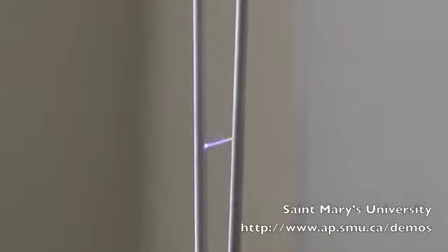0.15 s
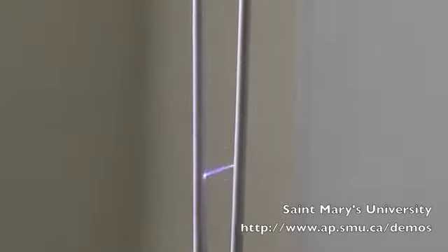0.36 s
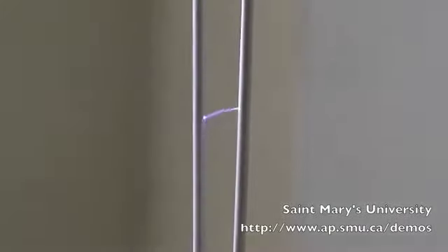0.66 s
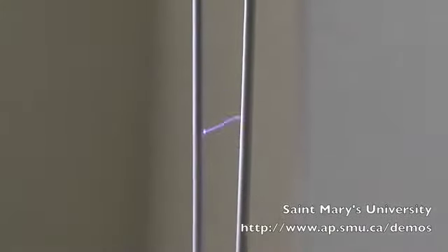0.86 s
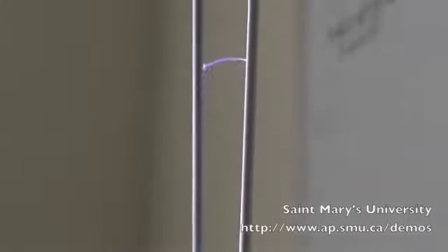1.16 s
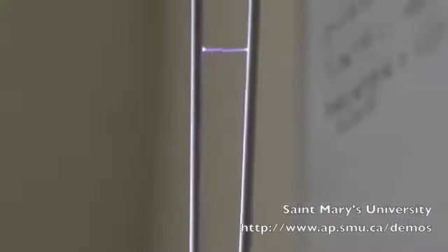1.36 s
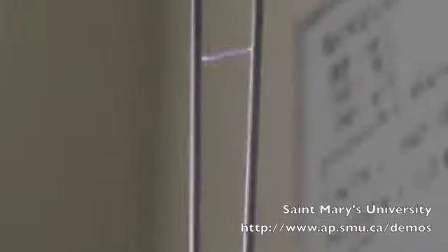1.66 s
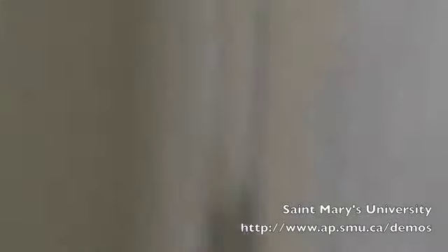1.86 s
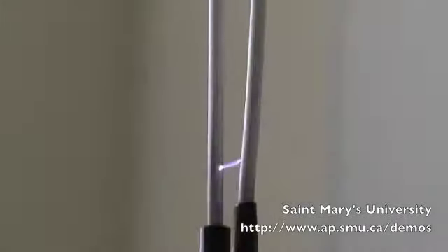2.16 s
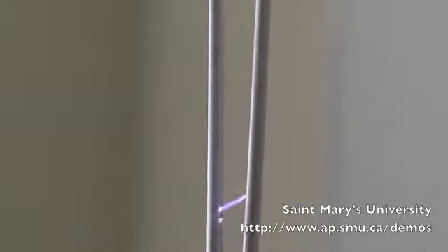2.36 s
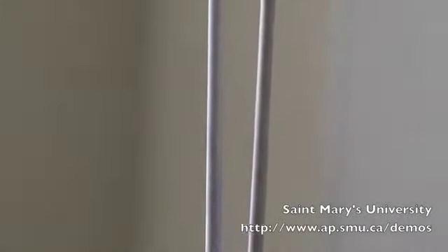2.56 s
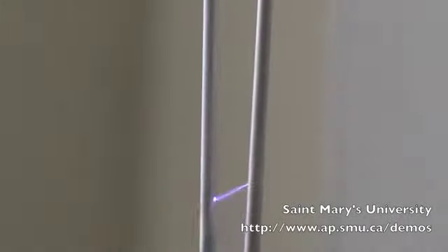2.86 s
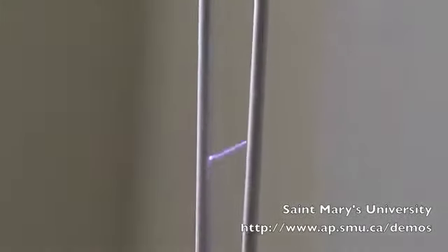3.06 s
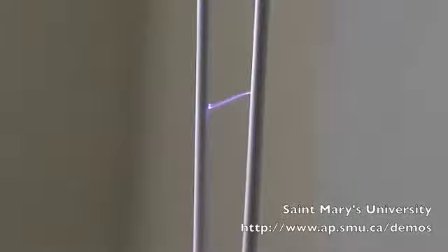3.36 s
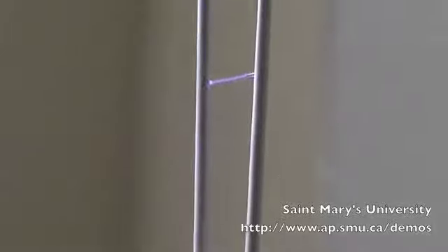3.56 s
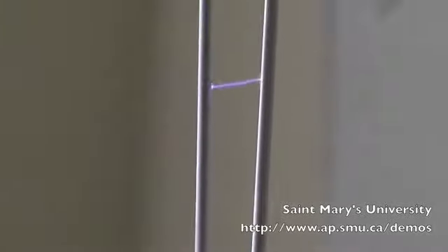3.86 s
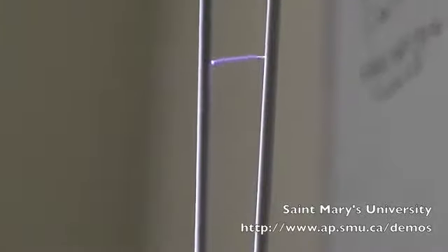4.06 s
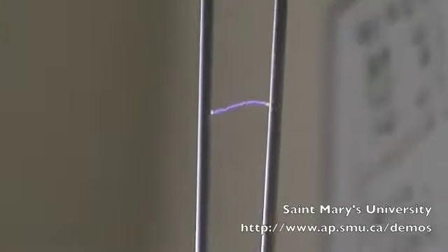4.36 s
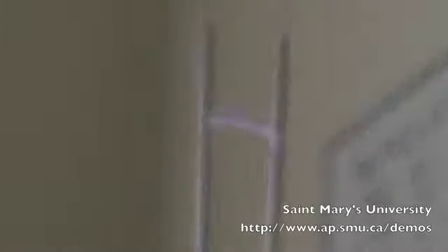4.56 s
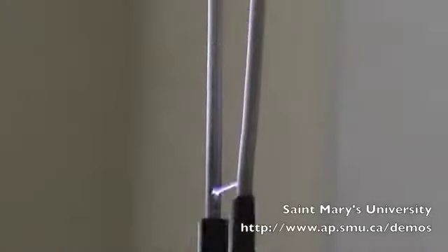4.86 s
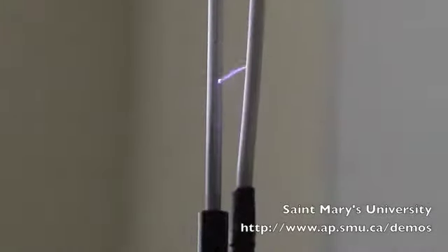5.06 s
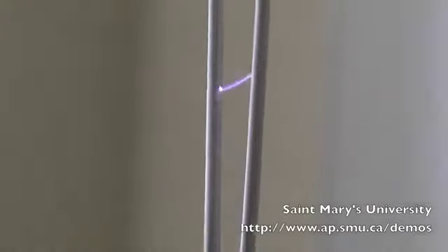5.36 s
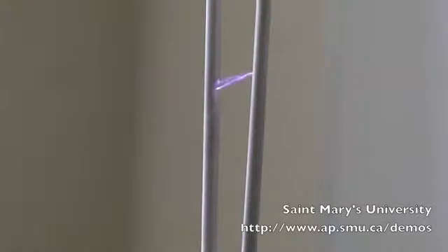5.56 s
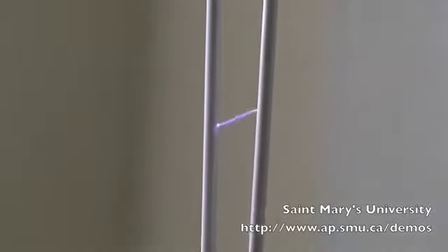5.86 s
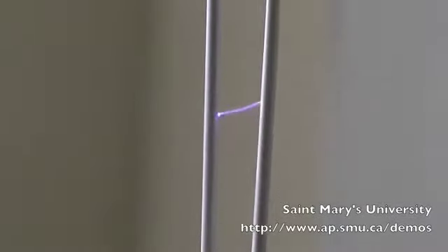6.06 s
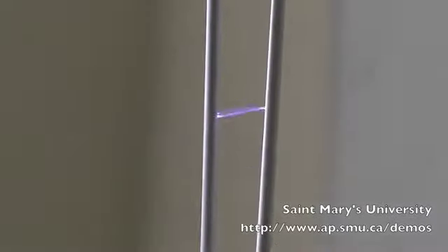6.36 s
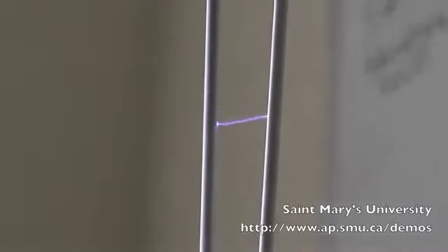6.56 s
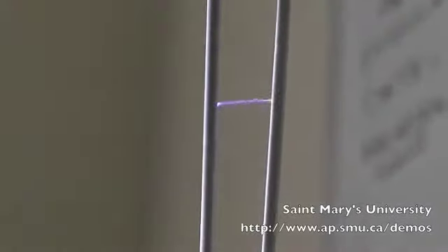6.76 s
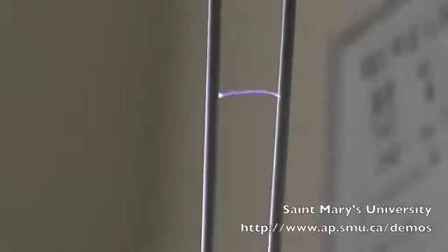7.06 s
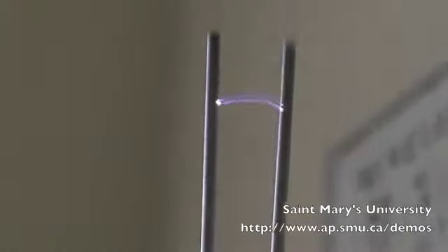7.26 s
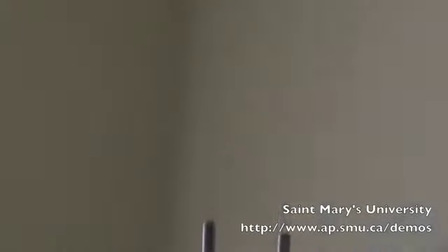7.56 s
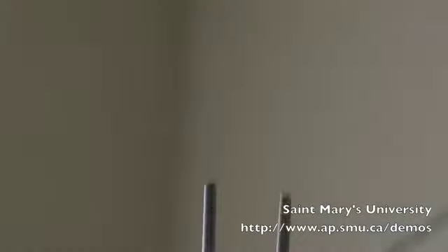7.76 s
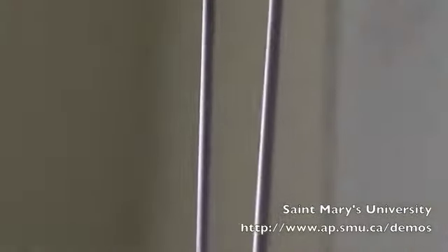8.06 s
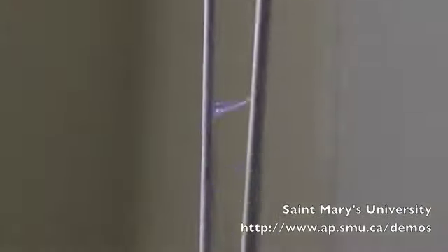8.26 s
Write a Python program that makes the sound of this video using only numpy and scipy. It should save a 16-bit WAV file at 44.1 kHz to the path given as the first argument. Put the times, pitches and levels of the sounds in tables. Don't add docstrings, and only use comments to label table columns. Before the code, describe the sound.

A high-voltage spark between two rods makes a continuous, raspy sixty-per-second buzz with sharp, bright snaps. Its colour slides as the arc climbs, then jolts roughly when it restarts low near 2 and 4.8 seconds. A faint distant engine drones in swells in the middle. Close stereo microphones in a hard, reverberant room swing away near 7.5 seconds, changing the echoes.

```python
import sys
import numpy as np
from scipy import signal
from scipy.fft import rfft, irfft, next_fast_len
from scipy.io import wavfile
from scipy.ndimage import uniform_filter1d

SR = 44100
rng = np.random.default_rng(int(sys.argv[2]) if len(sys.argv) > 2 else 0)


def wav_record(signal):
    frames = np.transpose(np.atleast_2d(signal))
    bounded = np.clip(frames, -1, 1)
    quanta = np.round(bounded * 32767).astype(np.int16)
    wavfile.write(sys.argv[1], SR, quanta)


def boost(x):
    u = np.asarray(x, float) / 20
    return 10 ** u


N = 370881

MAINS_HZ = 60
TURN_S = 7.54
MIC_GAP_MS = 0.085
ROOM_T60_S = 0.8

# start_s, end_s, spark arrival within the mains cycle_ms, mains slip_ms_per_s
TAKES = [
    (0, 2.1, 13.0, -.09),
    (1.7, 4.95, 2.11, .09),
    (4.6, 8.41, 13.17, .2),
]
# start_s, end_s
DISSOLVES = [
    (-1, -.5),
    (1.72, 2.08),
    (4.6, 4.92),
    (9, 9.5),
]
# pitch_hz, level_db per Hz
AIR_SPECTRUM = [(25, -1.5), (45, -15), (65, -1), (130, 1.5), (300, -5.5), (800, -1.5), (3000, -23),
                (16000, -39)]
# centre_s, level_db over the rumble, pitch_hz
THUDS = [
    (7.15, 4, 95),
    (7.82, 4, 90),
    (8.13, 6.5, 120),
]
# time_s, pitch_hz
ENGINE_PITCH = [
    (2.1, 92.3),
    (2.75, 94.5),
    (3.4, 103.6),
    (4.05, 109.3),
    (4.22, 104),
    (4.42, 108.5),
    (5.05, 106.5),
]
# start_s, length_s, level_db, octave_db against the tone, throb depth_0_to_1
ENGINE_SWELLS = [
    (2.246, 0.32, -73, -4, .2),
    (2.62, .66, -63.5, -12, .1),
    (3.37, 0.087, -64, -16.5, 0.3),
    (3.561, 0.51, -66, -8, 0.6),
    (4.15, .07, -71, -4, .1),
    (4.3, .3, -70, -14, .4),
    (4.62, 0.29, -66, -23, 0),
]
# start_s, level_db
UPSETS = [
    (1.775, -44),
    (2.11, -46.5),
    (4.835, -44),
    (4.95, -49),
    (7.545, -44),
    (7.63, -46),
]
# restart_s, ...
STRIKES = [
    (-.7, 1.761),
    (-.5, 2.111),
    (2.13, 4.831, 7.541),
]
# time_s, spark level_db, direct sound against the room_db
ARC_STRENGTH = [(0.0, -29, 3.5), (1.36, -29.5, 2.5), (1.42, -29, 2), (1.9, -29, 0), (2.1, -33, 3.5),
                (2.53, -29, 3), (3.61, -27.5, 2), (3.72, -30, 2), (4.0, -30, 2), (4.54, -32, 4.5),
                (4.78, -30.5, 0), (4.9, -29.5, 4), (5.1, -33, 3), (5.22, -28.5, 2), (6.07, -29.5, 3),
                (6.3, -29.5, 2.5), (7.1, -31, 3.5), (7.5, -28, -0.5), (7.82, -27, 2), (8.41, -31, 4)]
# time_s, lateness_ms, height jump_0_to_1, level_db against the usual
ODD_SPARKS = [(1.18, 0, 0, -2.5), (1.23, 0, 0, 2.5), (1.78, 0, 0, 2.5), (3.636, 0, 0, .5),
              (3.653, 0, 0, -4), (3.67, 0, 0, -2), (3.686, 0, 0, -1.5), (4.503, 0, 0, 1),
              (4.536, 0, 0, 2.5), (4.553, 0, 0, 2.5), (5.68, 0, 0, -3), (5.93, 0, 0, -2.5),
              (6.08, 0, 0, 2.5), (6.164, 0, 0, -2.5), (6.314, 0, 0, -3.5), (6.514, 0, 0, -2.5),
              (6.53, 0, 0, -3), (7.181, 0, 0, -3), (2.119, 0, 0, 2.5), (1.796, 0, 0, -20), (2.069, 0, 0, 2),
              (2.103, 0, 0, 5.5), (4.036, 0, 0, -1.5), (4.053, 0, 0, 4), (4.069, 0, 0, 2),
              (4.947, .63, .3, -1), (6.064, 0, 0, 3), (7.63, 0, 0, -6)]
# pitch_hz, level_db per Hz
SPARK_SPECTRUM = [(100, -69), (250, -68.5), (1300, -42.5), (2900, -36.5), (3500, -22), (3750, -14),
                  (5000, -9), (9000, -3.5), (12000, -4), (16000, -12.5)]
# lag with the arc low_ms, change at the top_ms, left_db, right_db
ECHOES = [(.27, -0.06, -18.5, -12.5), (.59, .36, -15, -15), (1.38, -.66, -14, -13), (2.99, 0, -5.5, -6),
          (4.47, -.36, -13, -10), (5.68, -1.3, -12.5, -25), (6.66, -.52, -25, -13), (8.14, -1.38, -13, -15),
          (10.25, -0.35, -30, -14), (11.96, -1.94, -14, -19), (13.35, -1.81, -15, -13),
          (13.45, .59, -17, -21.5), (16.57, -1.6, -20, -12)]
TURNED_ECHOES = [(.82, -2.2, -9, -11), (3.02, 0.81, -7.5, -7), (4.40, 0.97, -12, -8.5),
                 (5.21, 0.074, -9, -12), (6.4, -0.62, -16, -15), (7.8, -.5, -12, -14), (11.47, 0, -13, -12),
                 (13.33, -3, -16, -14)]
# pitch_hz, level_db
WALL_COLOUR = [(1500, 21), (5000, 0.7), (16000, -2)]
# pitch_hz, then level_db against the spark at four heights
LOW_ARC_MODES = [(180, -43, -47, -47, -49), (240, -38, -39, -38, -40), (300, -43, -45, -48, -47),
                 (360, -42, -42, -41, -40), (420, -38, -40, -40, -40), (480, -35, -35, -36, -37),
                 (540, -47, -44, -39, -38), (600, -32, -33, -33, -35), (660, -30, -31, -30, -30),
                 (720, -35, -34, -32, -33), (780, -38, -40, -40, -40), (840, -35, -38, -38, -41),
                 (900, -28, -31, -33, -36), (960, -42, -33, -28, -26), (1020, -28, -30, -30, -35),
                 (1080, -31, -32, -32, -35), (1140, -33, -36, -35, -38), (1200, -34, -40, -41, -40),
                 (1260, -38, -44, -36, -34), (1320, -26, -23, -21, -25), (1380, -35, -30, -29, -29),
                 (1440, -29, -32, -32, -34), (1500, -36, -44, -38, -38), (1560, -30, -36, -33, -32),
                 (1620, -26, -30, -34, -35), (1680, -29, -30, -26, -26), (1740, -29, -32, -27, -24),
                 (1800, -33, -35, -39, -33), (1860, -44, -42, -36, -36), (1920, -24, -27, -33, -26)]
LOW_ARC_UPPER_MODES = [(1980, -28, -31, -37, -33), (2040, -27, -31, -30, -29), (2100, -32, -29, -34, -33),
                       (2160, -37, -57, -51, -43), (2220, -27, -34, -38, -34), (2280, -36, -29, -25, -33),
                       (2340, -29, -30, -32, -27), (2400, -31, -30, -29, -23), (2460, -30, -34, -38, -44),
                       (2520, -28, -41, -31, -29), (2580, -34, -31, -31, -30), (2640, -25, -23, -30, -24),
                       (2700, -25, -22, -27, -30), (2760, -31, -28, -31, -28), (2820, -46, -51, -49, -51),
                       (2880, -32, -32, -40, -33), (2940, -21, -24, -23, -26), (3000, -27, -29, -17, -22),
                       (3060, -28, -22, -32, -28), (3120, -27, -33, -31, -32), (3180, -30, -32, -31, -33),
                       (3240, -26, -23, -22, -28), (3300, -31, -21, -31, -30), (3360, -23, -22, -33, -30),
                       (3420, -29, -35, -34, -24), (3480, -34, -34, -42, -40), (3540, -27, -33, -33, -30),
                       (3600, -27, -22, -29, -20), (3660, -29, -30, -27, -25)]
# pitch_hz, then level_db at four heights
HIGH_ARC_MODES = [(180, -52, -50, -48, -49), (240, -41, -41, -41, -40), (300, -52, -49, -46, -41),
                  (360, -39, -37, -36, -34), (420, -41, -42, -42, -40), (480, -38, -40, -41, -39),
                  (540, -36, -36, -35, -34), (600, -37, -42, -46, -45), (660, -30, -32, -34, -33),
                  (720, -33, -34, -32, -29), (780, -38, -37, -35, -34), (840, -41, -38, -36, -35),
                  (900, -40, -51, -42, -37), (960, -27, -29, -28, -25), (1020, -45, -40, -32, -27),
                  (1080, -35, -36, -37, -39), (1140, -40, -40, -42, -46), (1200, -41, -38, -36, -39),
                  (1260, -32, -27, -24, -25), (1320, -34, -26, -24, -26), (1380, -28, -26, -25, -23),
                  (1440, -38, -31, -31, -27), (1500, -46, -36, -35, -32), (1560, -35, -33, -28, -28),
                  (1620, -30, -29, -26, -27), (1680, -28, -27, -30, -41), (1740, -28, -27, -22, -27),
                  (1800, -31, -35, -36, -30), (1860, -39, -44, -51, -37), (1920, -31, -42, -39, -28)]
HIGH_ARC_UPPER_MODES = [(1980, -39, -32, -37, -31), (2040, -34, -35, -28, -40), (2100, -30, -29, -29, -34),
                        (2160, -44, -45, -33, -28), (2220, -34, -28, -33, -29), (2280, -27, -28, -34, -25),
                        (2340, -27, -22, -22, -22), (2400, -28, -29, -36, -27), (2460, -47, -50, -31, -27),
                        (2520, -31, -38, -31, -46), (2580, -30, -27, -28, -28), (2640, -25, -23, -29, -23),
                        (2700, -27, -28, -23, -20), (2760, -30, -28, -28, -25), (2820, -40, -36, -35, -45),
                        (2880, -53, -28, -26, -38), (2940, -26, -31, -30, -20), (3000, -20, -25, -29, -22),
                        (3060, -30, -23, -21, -28), (3120, -30, -36, -33, -28), (3180, -35, -32, -35, -35),
                        (3240, -29, -33, -29, -32), (3300, -25, -21, -28, -26), (3360, -32, -25, -20, -24),
                        (3420, -29, -30, -26, -24), (3480, -36, -35, -35, -32), (3540, -31, -27, -30, -36),
                        (3600, -27, -24, -23, -27), (3660, -26, -28, -22, -24)]
# pitch_hz, arc at the rod tips_db, just after the turn_db, a little later_db
LATE_MODES = [(180, -49, -47, -45), (240, -41, -36, -36), (300, -40, -47, -44), (360, -33, -42, -40),
              (420, -42, -39, -38), (480, -37, -35, -35), (540, -35, -40, -39), (600, -48, -32, -31),
              (660, -29, -26, -28), (720, -28, -29, -32), (780, -35, -40, -39), (840, -40, -38, -36),
              (900, -44, -33, -30), (960, -24, -32, -30), (1020, -25, -24, -26), (1080, -36, -31, -29),
              (1140, -33, -30, -32), (1200, -43, -35, -38), (1260, -36, -37, -38), (1320, -25, -24, -21),
              (1380, -28, -22, -25), (1440, -20, -42, -33), (1500, -27, -43, -41), (1560, -31, -27, -33),
              (1620, -26, -27, -32), (1680, -31, -24, -25), (1740, -21, -30, -31), (1800, -41, -38, -35),
              (1860, -50, -35, -36), (1920, -23, -27, -31)]
LATE_UPPER_MODES = [(1980, -23, -37, -38), (2040, -38, -22, -26), (2100, -29, -25, -26),
                    (2160, -35, -45, -49), (2220, -31, -44, -41), (2280, -34, -23, -27),
                    (2340, -22, -26, -28), (2400, -21, -23, -33), (2460, -32, -30, -31),
                    (2520, -46, -29, -31), (2580, -36, -30, -31), (2640, -29, -26, -23),
                    (2700, -19, -30, -24), (2760, -26, -30, -28), (2820, -46, -39, -47),
                    (2880, -28, -31, -28), (2940, -24, -32, -21), (3000, -23, -31, -24),
                    (3060, -23, -29, -21), (3120, -31, -36, -29), (3180, -36, -35, -29),
                    (3240, -29, -23, -18), (3300, -24, -22, -18), (3360, -26, -29, -24),
                    (3420, -27, -35, -34), (3480, -37, -31, -47), (3540, -36, -30, -27),
                    (3600, -28, -23, -22), (3660, -19, -20, -29)]
# pitch_hz, phase_rad
MODE_SKEW = [(300, .12), (750, 0.23), (1200, 0.18), (1600, 0.029), (2500, 0.12), (3400, 0.27)]


def rms_one(x):
    return x / np.sqrt(np.mean(x ** 2) + 1e-20)


def along(rows, s):
    t, *columns = np.transpose(rows)
    return [np.interp(s, t, c) for c in columns]


def colour(points, size):
    hz, level_db = np.transpose(points)
    grid = np.maximum(np.fft.rfftfreq(size, 1 / SR), 1)
    return boost(np.interp(np.log(grid), np.log(hz), level_db))


def dissolve(rise, fall, s):
    return np.interp(s, rise, [0, 1]) * np.interp(s, fall, [1, 0])


def room_air(side_db):
    mid, side = irfft(rfft(rng.standard_normal((2, N))) * colour(AIR_SPECTRUM, N), N)
    t = np.arange(N) / SR
    power = np.zeros(N)
    for take_db, rise, fall in zip((-67.5, -67, -65.5), DISSOLVES, DISSOLVES[1:]):
        power += (boost(take_db) * dissolve(rise, fall, t)) ** 2
    return np.sqrt(power) * rms_one(mid + boost(side_db) * side * [[1], [-1]])


def handling(width_hz):
    centre_hz, from_s, thud_s, level_db = 62.7, 6.8, 0.05, -72
    t = np.arange(N) / SR
    band = signal.butter(2, [centre_hz - width_hz, centre_hz + width_hz], "band", fs=SR, output="sos")
    out = rms_one(signal.sosfilt(band, rng.standard_normal(N))) * np.clip(t - from_s, 0, 1)
    for s, over_db, hz in THUDS:
        swell = np.exp(-((t - s) / thud_s) ** 2)
        out += boost(over_db) * swell * np.sin(2 * np.pi * hz * (t - s))
    return boost(level_db + np.array([[1.5], [-1.5]])) * out


def drone():
    edge_s, throb_hz = 0.056, 14
    t = np.arange(N) / SR
    hz, = along(ENGINE_PITCH, t)
    phase = 2 * np.pi * np.cumsum(hz) / SR
    out = np.zeros(N)
    for start, length, level_db, octave_db, throb in ENGINE_SWELLS:
        to_edge = np.minimum(t - start, start + length - t)
        shape = np.clip(to_edge / edge_s + 1, 0, 1) ** 2
        tone = (1 + throb * np.sin(2 * np.pi * throb_hz * t)) * np.sin(phase)
        octave = boost(octave_db) * np.sin(2 * phase)
        out += shape * boost(level_db) * (tone + octave)
    return np.sqrt(2) * out * boost(np.array([[1.2], [-1.2]]))


def upsets():
    t60_s, attack_s = 1, 0.0021
    t = np.arange(N) / SR
    shape = np.zeros(N)
    for s, level_db in UPSETS:
        decay = boost(level_db - 60 * np.maximum(t - s, 0) / t60_s)
        shape += decay * np.clip((t - s) / attack_s, 0, 1)
    band = signal.butter(2, (445, 2720), "band", fs=SR, output="sos")
    return shape * rms_one(signal.sosfilt(band, np.diff(rng.standard_normal(N + 1))))


def climb(strikes, s, linger):
    last = np.array(strikes)[np.searchsorted(strikes, s) - 1]
    rising = np.polyval((.07, .18, .06), s - last - linger)
    followed = -.15 * (s - last)
    return np.where(last > TURN_S, followed, rising)


def sparks(jitter_ms, flicker_db, surge_db, wriggle):
    late_ms_per_height, bend_db = .56, .9
    linger_s = (.2, .1, 0)
    out = []
    for take, strikes, linger, rise, fall in zip(TAKES, STRIKES, linger_s, DISSOLVES, DISSOLVES[1:]):
        start, end, phase_ms, slip = take
        first = np.ceil(start * MAINS_HZ) - 30 * (start == 0)
        cycle = np.arange(first, end * MAINS_HZ) / MAINS_HZ
        height = climb(strikes, cycle + phase_ms / 1000, linger)
        arrival_ms = phase_ms + slip * (cycle - start) + late_ms_per_height * height
        chance = rng.standard_normal((len(cycle), 4))
        surge = uniform_filter1d(chance[:, 3], size=6) * np.sqrt(6)
        bend = uniform_filter1d(chance[:, 1], size=5) * np.sqrt(5)
        s = cycle + (arrival_ms + jitter_ms * chance[:, 0]) / 1000
        fade = dissolve(rise, fall, s)
        strength_db, direct_db = along(ARC_STRENGTH, s)
        for when, late_ms, jump, odd_db in ODD_SPARKS:
            this = (abs(s - when) < .5 / MAINS_HZ) & (fade > .7)
            s = s + this * late_ms / 1000
            height = height + this * jump
            strength_db = strength_db + this * odd_db
        size = fade * boost(strength_db + flicker_db * chance[:, 2] + surge_db * surge)
        out.append([s, height + wriggle * chance[:, 1], size, boost(direct_db + bend_db * bend)])
    return np.concatenate(out, axis=1)


def lay(s, size, fine=3):
    length = next_fast_len(N + SR)
    out = []
    for when, how in zip(s, size):
        at = np.round(when.ravel() * SR * fine).astype(int)
        inside = at < N * fine
        clicks = np.bincount(at[inside] % (length * fine), how.ravel()[inside], length * fine)
        out.append(rfft(clicks)[:length // 2 + 1])
    return np.array(out), length


def wall_echoes(table, s, height, size, shimmer_db):
    lag_ms, slide_ms, left_db, right_db = np.transpose(table)
    when = s[:, None] + (lag_ms + slide_ms * height[:, None]) / 1000
    lead = np.clip((left_db - right_db) / 4, -1, 1) * MIC_GAP_MS / 4000
    gain = size[:, None] * boost(shimmer_db * rng.standard_normal(when.shape))
    return np.array([when - lead, when + lead]), np.array([gain * boost(left_db), gain * boost(right_db)])


def diffuse(s, height, size, count, spread_db, pan_db, shimmer_db):
    room_db, turned_db = -16, 1
    a, b, c, d = rng.random((count, 4)).T
    lag = 0.0004855 + .75 * ROOM_T60_S * a ** 1.3
    slide_ms = 2.4 * b - 2.0
    when = s[:, None] + lag + slide_ms / 1000 * height[:, None]
    side = np.sign(c - .5) * abs(2 * c - 1) ** 3.1
    image_db = room_db - 60 * lag / ROOM_T60_S + spread_db * (2 * d - 1)
    polarity = np.sign(rng.random(count) - .3)
    gain = size[:, None] * boost(image_db) * polarity
    gain = gain * boost(turned_db * (s > TURN_S))[:, None]
    gain = gain * boost(shimmer_db * rng.standard_normal(when.shape))
    lead = side * MIC_GAP_MS / 2000
    return np.array([when - lead, when + lead]), np.array([gain * boost(pan_db * side), gain * boost(-pan_db * side)])


def standing_waves(s, height, size, width_hz, skew):
    heights = (.12, .2, .29, .38, .48, .59, .7, .82, .98)
    turned_at_s = (7.85, 8.25)
    rough_ms = .032
    widen_hz_per_khz, turn_rad_per_khz = 8, .2
    after = s > TURN_S
    share = [np.interp(height, heights, row) * ~after for row in np.eye(len(heights))]
    share += [np.interp(s, turned_at_s, row) * after for row in np.eye(2)]
    unsteady = s + rough_ms / 1000 * rng.standard_normal((len(share), len(s)))
    drive, length = lay(unsteady, size * np.array(share), fine=1)
    grid = np.fft.rfftfreq(length, 1 / SR)
    out = np.zeros((2, length // 2 + 1), complex)
    per_cycle = SR / MAINS_HZ / np.sqrt(2)
    low = LOW_ARC_MODES + LOW_ARC_UPPER_MODES
    high = HIGH_ARC_MODES + HIGH_ARC_UPPER_MODES
    late = LATE_MODES + LATE_UPPER_MODES
    chance = 2 * rng.random((len(low), 2)) - 1
    for (hz, *low_db), (_, *high_db), (_, *late_db), (phase, lean) in zip(low, high, late, chance):
        near = slice(*np.searchsorted(grid, [hz - 3 * MAINS_HZ, hz + 3 * MAINS_HZ]))
        offset_hz = grid[near] - hz
        wander = np.cumsum(rng.standard_normal(len(share)))
        turn = np.exp(1j * turn_rad_per_khz * hz / 1000 * wander)
        kicks = boost(np.array([*low_db, *high_db, *late_db])) * turn @ drive[:, near]
        ring = per_cycle * kicks / (1 + 2j * offset_hz / (width_hz + widen_hz_per_khz * hz / 1000))
        ring = ring * np.exp(.5 * (2 * np.pi * hz * rough_ms / 1000) ** 2)
        step = offset_hz / MAINS_HZ
        ring = ring * np.sinc(step) * np.exp(-1j * np.pi * step)
        spread = np.interp(hz, (900, 1500), [np.pi, 2.1])
        half_gap = along(MODE_SKEW, hz)[0] * (np.sign(lean) + skew * lean)
        out[:, near] += -1j * ring * np.exp(1j * spread * phase + 1j * half_gap * np.array([[1], [-1]]))
    return out


def arc():
    s, height, size, direct = sparks(jitter_ms=.005, flicker_db=.9, surge_db=.25, wriggle=.0035)
    after = s > TURN_S
    straight = wall_echoes([(0, 0, 0, 0)], s, height, size * direct * boost(.8), shimmer_db=.6)
    before = wall_echoes(ECHOES, s, height, size * ~after, shimmer_db=1.3)
    turned = wall_echoes(TURNED_ECHOES, s, height, size * after, shimmer_db=1.3)
    far = diffuse(s, height, size, count=1000, spread_db=4.5, pan_db=7.5, shimmer_db=.8)
    images, length = lay(*(np.concatenate(parts, axis=2) for parts in zip(straight, before, turned)))
    images = images + lay(*far)[0] * colour(WALL_COLOUR, length)
    top_hz = 15850
    pulse = -1j * colour(SPARK_SPECTRUM, length) * (np.fft.rfftfreq(length, 1 / SR) < top_hz)
    snaps = boost(np.array([[28.9], [29.2]])) * images * pulse
    modes = standing_waves(s, height, size, width_hz=10, skew=.5)
    return irfft(snaps + modes, length)[:, :N]


def scene():
    background = room_air(side_db=-5.5) + handling(width_hz=7.6) + drone()
    return background + upsets() + arc()


def band_limit(x):
    return signal.sosfilt(signal.butter(12, 15850, fs=SR, output="sos"), x)


def record(dry):
    return band_limit(dry)


dry = scene()
out = record(dry)
wav_record(out)
```